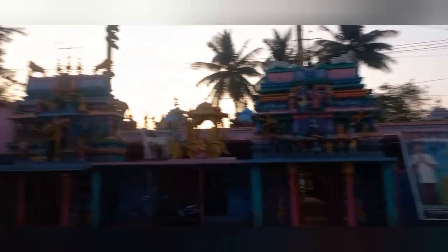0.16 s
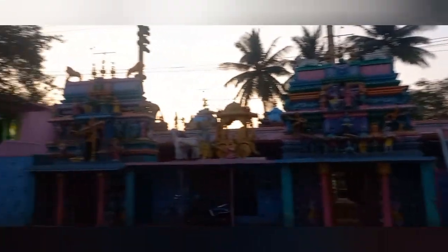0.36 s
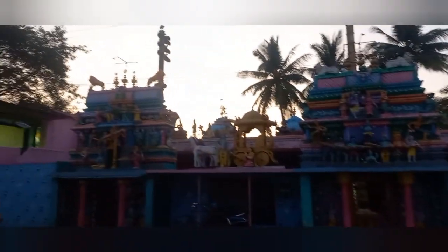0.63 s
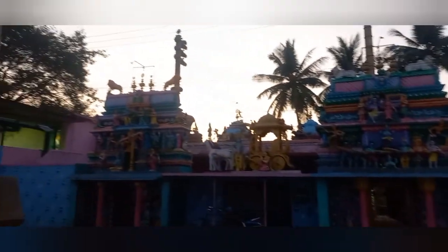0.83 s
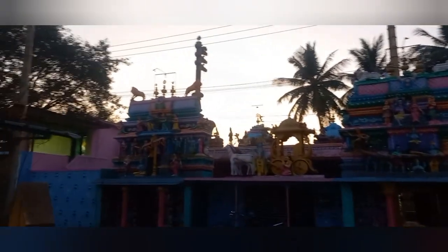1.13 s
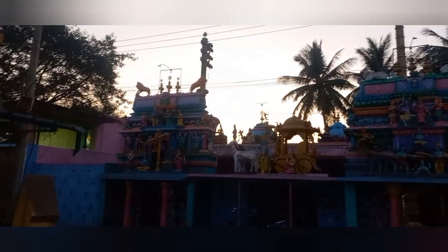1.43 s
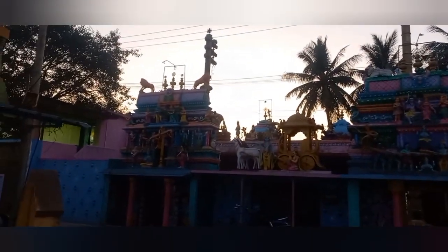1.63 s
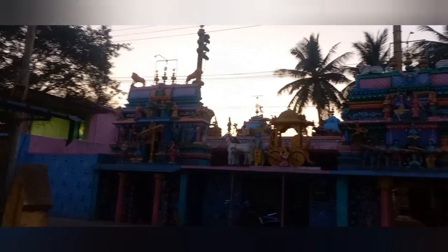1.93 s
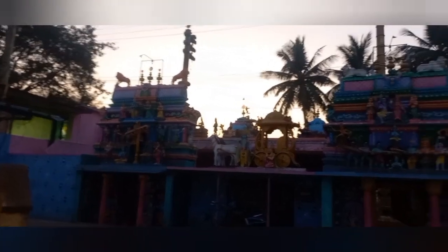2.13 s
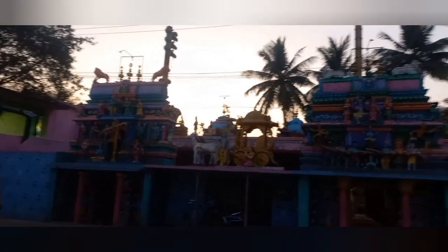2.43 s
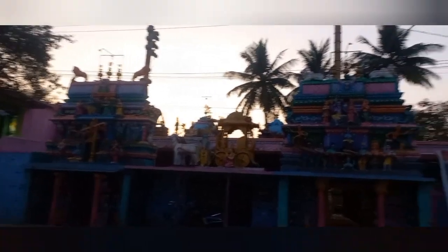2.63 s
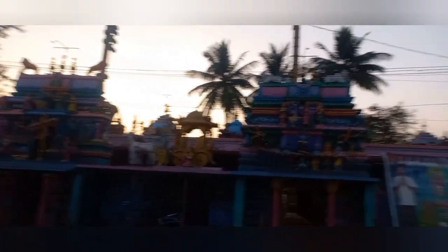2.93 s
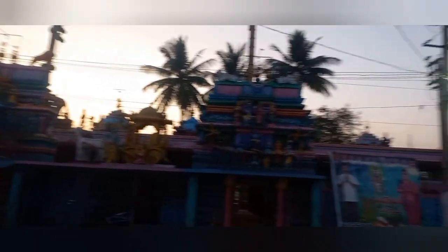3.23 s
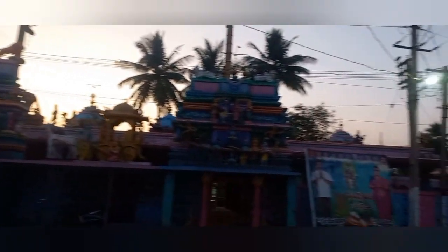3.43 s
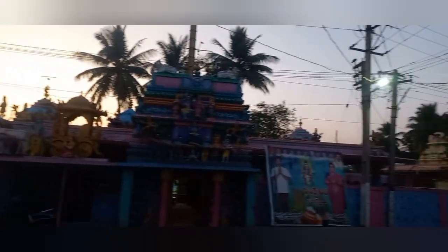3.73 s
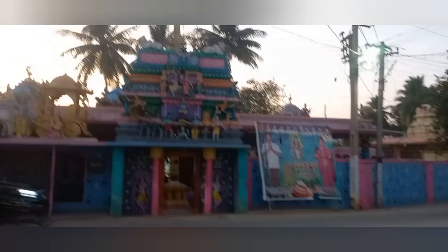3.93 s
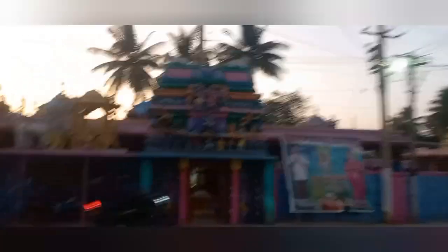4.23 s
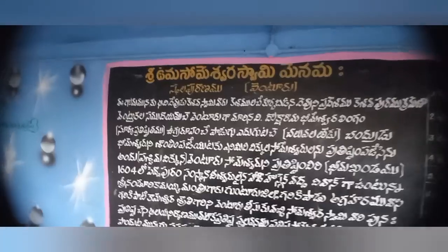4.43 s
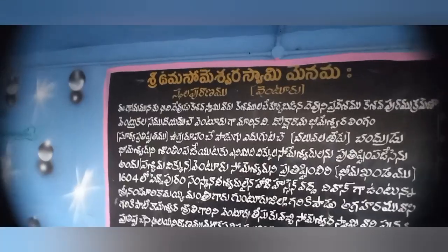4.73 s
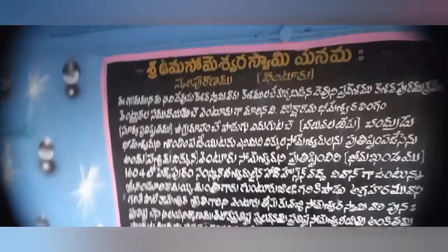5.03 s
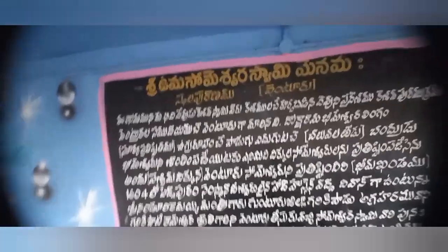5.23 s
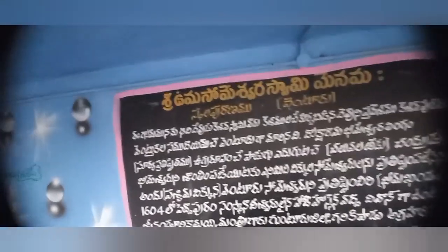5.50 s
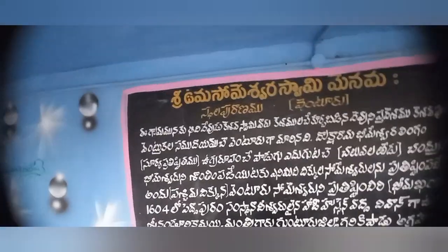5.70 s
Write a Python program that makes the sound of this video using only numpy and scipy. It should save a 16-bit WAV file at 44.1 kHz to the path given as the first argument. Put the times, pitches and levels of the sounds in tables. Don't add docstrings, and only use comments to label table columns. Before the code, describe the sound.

A bush cricket sings very close, left of the phone, throughout the roughly six seconds. Its dry, piercing chirps, centred near 7 kHz, come about ten a second in runs of two to nine, with short rests filled by echoes from house walls. Underneath lie a soft, low wash of distant town traffic and a steady faint electrical hum. A far horn sounds thin and blurred at the start and again around 0.5 seconds; another, very faint, comes in pieces from 1.55 to 2.5, and a third at about 4.4 to 4.7, dying away in echoes. A distant small engine throbs from 0.9 to 1.9, strongest near 1.6. A barely noticeable tick lands at 2.34. From 2.2 a nearer small engine fades in, low and puttering, pulsing through gaps between houses; after 4.2 it speeds up, loudest at the end, still running.

```python
import sys
import numpy as np
from scipy import signal
from scipy.fft import rfft, irfft, next_fast_len
from scipy.io import wavfile
from scipy.ndimage import uniform_filter1d

SR = 44100
rng = np.random.default_rng(int(sys.argv[2]) if len(sys.argv) > 2 else 0)


def volts(x):
    e = np.asarray(x, float) / 20
    return 10 ** e


def wav_record(signal):
    frames = np.transpose(np.atleast_2d(signal))
    bounded = np.clip(frames, -1, 1)
    quanta = np.round(bounded * 32767).astype(np.int16)
    wavfile.write(sys.argv[1], SR, quanta)


N = 258424
T = np.arange(N) / SR
COARSE = np.arange(0, N / SR + .01, .002)

# first chirp in seconds, number of chirps, seconds between chirps.
SONG = [(-.569, 9, .096), (.303, 4, .1063), (.721, 7, .0966), (1.473, 4, .0967), (1.856, 2, .091),
        (2.044, 3, .0965), (2.329, 3, .089), (2.601, 4, .0957), (2.984, 3, .099), (3.324, 3, .098),
        (3.615, 3, .0915), (3.961, 7, .0958), (4.62, 1, 0), (4.775, 3, .1055), (5.086, 5, .1013),
        (5.588, 4, .096)]
# seconds from the strongest tick, level in dB, level of the overtone in dB.
TICKS = [(-.0320, -7, -1), (-.0285, -5.5, -5), (-.0235, -12, -3), (-.0178, 1.5, -3), (-.0145, 1, -3),
         (-.0105, -16.5, -4), (-.0075, -10.5, -2), (-.0040, -2.5, -6), (-.0008, 2, -5), (.0027, -1.5, -3),
         (0.0115, -9, -2), (0.0141, -2, -5), (0.0143, -6, -9), (0.019, -12.5, -7), (0.026, -7.5, -9),
         (0.027, -11.5, -7), (0.034, -11, -6), (0.0447, -8.5, -10)]
CHIRP_SCATTER_DB, TIRING_DB_PER_S, TICK_SCATTER_DB = -0.4, -0.09, .9
# frequency in Hz, level in dB per Hz.
WING = [(5400, -41), (5850, -30), (6150, -22), (6450, -8), (6700, -3.5), (6900, 4), (7150, -4),
        (7400, -7.5), (7650, -21), (8000, -26.5), (8400, -38), (8900, -57)]
# frequency in Hz, left minus right in dB.
WING_LEAN = [(5500, 2), (6300, 4), (6900, 8.5), (7400, 11.5), (7900, 7.5), (8300, 2)]
# frequency in Hz, level in dB per Hz.
OVERTONE = [(11000, -29), (12200, -2), (13000, 6), (14000, 7), (15000, -8), (16000, -5.5)]

# multiple, level in dB.
FIRST_HORN = ([(-.4, 0.52, 0.534, -44, 200), (.5, 0.087, 0.61, -53, 34)], 407, 48, [(6.93, -4), (7, 1),
               (7.92, -8), (8, -11.5), (8.91, -13.5), (9, -14), (9.9, -24), (10.9, -30.5)])
SECOND_HORN = ([(1.55, .11, 1.84, -60, 150), (1.86, 0.13, 2.29, -58, 121), (2.38, .04, 2.48, -59, 89.4)],
                450.7, 31, [(6.93, -6), (7, -0.5), (8, 1), (9, -9), (10, -15)])
THIRD_HORN = ([(4.37, .14, 4.64, -47.5, 45.8)], 364.5, 38, [(5, -8), (6, -15), (8, -12), (9, 3), (10, -19),
               (12, -17)])
# time in seconds, rise in dB.
BEADS = [(.148, 3.1), (.204, 7.1), (.368, 8.2), (.476, 6.2), (.53, 2.9), (1.72, 3.4), (2.2, 1.6), (4.49, 1),
         (4.568, 6.6), (4.645, 3), (4.81, 4), (4.97, 3.7)]
BEAD_S = 0.011

# time in seconds, firings a second, level in dB.
BIKE = [
    (2.2, 22.3, -46),
    (2.65, 20.4, -44.5),
    (3.2, 21.8, -42),
    (3.6, 21.3, -38),
    (4.05, 21.3, -36),
    (4.45, 24.8, -38.5),
    (4.95, 28.4, -34),
    (5.3, 30.1, -35),
    (5.86, 32.8, -28.5),
]
# time in seconds, firings a second, level in dB.
FAR_BIKE = [
    (0.9, 27.8, -52.5),
    (1.06, 28, -39.5),
    (1.6, 27.67, -34.5),
    (1.7, 27.5, -46),
    (1.76, 26.6, -38),
    (1.9, 25.8, -54),
]
# frequency in Hz, level in dB.
EXHAUST = [(40, -38), (55, -30), (65, -9.5), (90, -12.5), (125, 2.5), (150, 4), (175, -2.5), (200, -12),
           (260, -19.5)]
# time in seconds, rise in dB.
GAPS = [(2.33, 5.6), (2.65, 5.8), (3.16, 6), (3.53, 7.6), (3.95, 3.8), (4.26, 4), (4.61, 6.2), (4.82, 4.03),
        (4.95, 4.2), (5.13, 7), (5.62, 4.8)]
GAP_S = 0.038
GUST_DB, GUSTS_PER_S = 1., 8.

MAINS_HZ = 100.03
# multiple of twice the mains, level in dB.
HUM = [(3, -42.5), (6, -57.5), (9, -60), (11, -53.5), (12, -55.5), (14, -55.5), (15, -59.5), (16, -64),
       (17, -51), (18, -50), (21, -67.5), (22, -87), (23, -82), (33, -72), (38, -79)]
# pitch in Hz, width in Hz, level in dB.
DRONES = [(362.7, 24, -50.5), (1023, 36, -53.5), (86.2, 8.6, -52), (262.8, 7.5, -50), (223, 5.3, -52),
          (294, 33, -51.5), (1810, 60, -64)]
# frequency in Hz, level in dB per Hz.
TOWN = [(30, -58), (45, -47), (55, -30), (70, -20), (90, 1), (200, -6.5), (400, -8), (800, -15),
        (1600, -19), (2600, -24.5), (5000, -34), (8500, -44.5), (10300, -49), (16000, -38)]
TOWN_DB = -34
# frequency in Hz, likeness from 0 to 1, left minus right in dB, lead of the left in radians.
PORTS = [(60, 1, -1.5, 0), (150, 0.99, 1.3, 0), (276, 0.99, -1, 0), (665, 1, 0.5, 0.078),
         (2440, 1, -1, 0.032), (3310, 0.97, 2, 0.064), (4200, 0.84, 3, 0.46), (5500, 1, 3, 0.45),
         (8600, 1, 10, 0), (9600, 1, -7, 0.0012), (11200, 0.45, -12, 0.97), (13000, .9, -5, 0.92),
         (16000, .82, 2, 1.1)]
# time in seconds, level in dB, pitch in Hz, width in Hz.
CLICK = (2.3445, -44, 10600, 1200)
EDGE_HZ = 15750


def cricket():
    times = np.concatenate([s + gap * np.arange(many) for s, many, gap in SONG])
    chirp_db = TIRING_DB_PER_S * times + CHIRP_SCATTER_DB * rng.standard_normal(len(times))
    ticks, lead_in = np.array(TICKS), 2 * SR // 3
    length = next_fast_len(N + 2 * lead_in, True)
    chance = rng.standard_normal((len(times), len(ticks) + 1, 3))
    stretch = 1 + .035 * chance[:, :1, 0]
    s = times[:, None] + ticks[:, 0] * stretch + .0003 * chance[:, 1:, 0] - .0008
    at = np.round(s * SR).astype(int).ravel() + lead_in

    def tick_gains(column):
        scatter_db = TICK_SCATTER_DB * chance[:, 1:, column]
        return volts(chirp_db[:, None] + ticks[:, column] + scatter_db).ravel()

    hz = np.fft.rfftfreq(length, 1 / SR)
    wing = street(scrapes(at, tick_gains(1), WING, length, count=10), 0.97, 2.3, -16)
    over = street(scrapes(at, tick_gains(2), OVERTONE, length, count=10), .55, 2.5, -14)
    wing = ports(wing, read(WING_LEAN, hz), 0.82)[:, lead_in:lead_in + N]
    over = ports(over, -2.5 + 0 * hz, 0.82)[:, lead_in:lead_in + N]
    return volts(-29.0) * evened(wing) + volts(-63.0) * evened(over)


def scrapes(at, gains, colour, length, count=6):
    spread = np.arange(200) / SR / 0.00066
    bursts = rng.standard_normal((2 * count, len(spread))) * spread * np.exp(-spread)
    bursts = signal.fftconvolve(bursts, ring(colour)[None], axes=1)
    bursts = bursts[np.argsort(np.linalg.norm(bursts, axis=1))[count:]]
    bursts /= np.linalg.norm(bursts, axis=1, keepdims=True)
    trains = np.zeros((count, length))
    np.add.at(trains, (rng.integers(0, count, len(at)), at), gains)
    return signal.oaconvolve(trains, bursts, axes=1)[:, :length].sum(0)


def ring(points):
    hz = np.fft.fftfreq(4096, 1 / SR)
    inside = (abs(hz) > points[0][0]) & (abs(hz) < points[-1][0])
    floor_db = np.min(points, 0)[1] - 12
    log_gain = np.log(volts(np.where(inside, read(points, abs(hz)), floor_db)))
    return np.fft.ifft(np.exp(signal.hilbert(log_gain).conj())).real[:1024]


def street(x, t60, wet_db, own_db):
    t = np.arange(2 * SR // 3) / SR
    signs = rng.choice([-1., 1.], (3, len(t)))
    sparse = rng.random((3, len(t))) < .06
    taps = signs * sparse * volts(-60 * t / t60) * (t > .003)
    taps /= np.linalg.norm(taps[0])
    tails = signal.fftconvolve(x[None], taps, axes=1)[:, :len(x)]
    return x + volts(wet_db) * (tails[0] + volts(own_db) * tails[1:])


def ports(pair, lean_db, lead):
    tilt = volts(lean_db / 2) * np.exp(.5j * lead)
    return irfft(rfft(pair) * np.array([tilt, 1 / tilt]), pair.shape[1])


def horn(rows, hz, smear, overtones):
    return presses(rows) * sum(volts(db) * whistle(k * hz, smear, steady=0.33) for k, db in overtones)


def presses(rows):
    power = 0
    for start, swell, until, db, fade_db in rows:
        rise = np.clip((T - start) / swell, 0, 1) ** 2
        power = power + (rise * volts(db - fade_db * np.maximum(T - until, 0))) ** 2
    return np.sqrt(power)


def swells(rows, width):
    rise_db = sum(db * np.exp(-.5 * ((COARSE - s) / width) ** 2) for s, db in rows)
    return np.interp(T, COARSE, volts(rise_db))


def engine(rows, trim_db):
    s, rate, _ = np.transpose(rows)
    rate = np.interp(T, s, rate)
    turns = np.cumsum(rate) / SR
    orders = 0
    for k in range(2, 10):
        gain = volts(read(EXHAUST, k * rate) + 3.6 * drift(6.))
        orders = orders + gain * np.cos(2 * np.pi * (k * turns + rng.random()))
    steadied = orders / np.sqrt(uniform_filter1d(orders ** 2, 9000) + 1e-9)
    return volts(trim_db + GUST_DB * drift(GUSTS_PER_S)) * passing(rows) * steadied


def passing(rows):
    s, db = np.array(rows)[:, 0], np.array(rows)[:, -1]
    since = T - s[0] + (s[0] < .01)
    left = s[-1] - T + (s[-1] > T[-1] - .02)
    return volts(np.interp(T, s, db)) * np.clip(np.minimum(since, left) / 0.068, 0, 1)


def click():
    s, db, hz, width = CLICK
    t = np.maximum(T - s, 0) * np.pi * width
    return volts(db) * t * np.exp(1 - t) * np.sin(2 * np.pi * hz * T)


def hum():
    core = 0
    for k, db in HUM:
        tone = np.sqrt(2) * np.sin(2 * np.pi * (k * MAINS_HZ * T + rng.random()))
        core = core + volts(db + 0.67 * drift(6.)) * tone
    return core + sum(volts(db) * whistle(hz, width) for hz, width, db in DRONES)


def town():
    frames, hz = N // 256 + 5, np.fft.rfftfreq(2048, 1 / SR)
    a, b, c, d, patches = rng.standard_normal((frames // 2, 1025, 5)).T
    patches = evened(uniform_filter1d(uniform_filter1d(patches, 12, 0), 10, 1))
    same = np.clip(read(PORTS, hz), 0, 1)[:, None]
    left, other = a + 1j * b, c + 1j * d
    right = same * left + np.sqrt(1 - same ** 2) * other
    tilt = (volts(read(PORTS, hz, size=2) / 2) * np.exp(.5j * read(PORTS, hz, size=3)))[:, None]
    z = np.array([left * tilt, right / tilt])
    z *= volts(read(TOWN, hz)[:, None] + 0.83 * patches)
    wash = signal.istft(z, nperseg=2048, noverlap=1536)[1][:, :N]
    return volts(TOWN_DB - 2.5) * evened(wash)


def whistle(hz, width, steady=0.):
    r = np.exp(-np.pi * width * (COARSE[1] - COARSE[0]))
    noise = rng.standard_normal((2, len(COARSE) + 200))
    a, b = signal.lfilter([1], np.convolve([1, -r], [1, -r]), noise)[:, 200:]
    a, b = np.array([a, b]) / np.hypot(a, b) ** np.clip(steady, 0, 1)
    turn = 2 * np.pi * hz * T
    return evened(np.interp(T, COARSE, a) * np.cos(turn) + np.interp(T, COARSE, b) * np.sin(turn))


def drift(hz):
    slow = sum(np.sin(2 * np.pi * (f * COARSE + rng.random())) for f in np.geomspace(hz / 8, hz, 8))
    return np.interp(T, COARSE, evened(slow))


def evened(x):
    return x / np.sqrt(np.mean(x ** 2) + 1e-20)


def read(points, hz, size=1):
    table = np.array(points)
    return np.interp(np.log(hz + 1), np.log(table[:, 0] + 1), table[:, size])


def scene():
    horns = (horn(*FIRST_HORN) + horn(*SECOND_HORN) + horn(*THIRD_HORN)) * swells(BEADS, BEAD_S)
    horns = horns * volts(np.array([[.9], [-.9]]))
    engines = engine(BIKE, -0.34) * swells(GAPS, GAP_S) + engine(FAR_BIKE, -2.6)
    return cricket() + horns + engines + click() + hum() + town()


def top_cut(x):
    return signal.sosfilt(signal.butter(12, 16030, fs=SR, output="sos"), x)


def record(dry):
    low_pass = signal.firwin(1023, EDGE_HZ, window=("kaiser", 9), fs=SR)
    mix = signal.oaconvolve(dry, low_pass[None], "same")
    return top_cut(mix)


dry = scene()
out = record(dry)
wav_record(out)
```